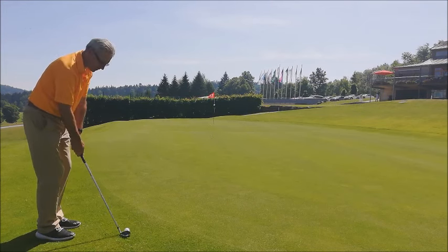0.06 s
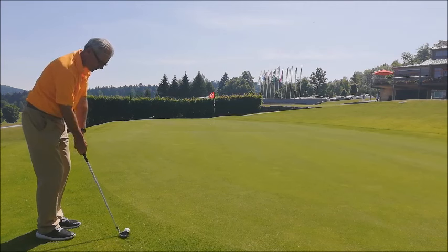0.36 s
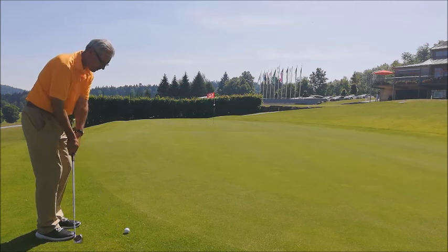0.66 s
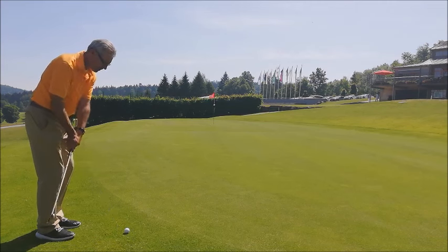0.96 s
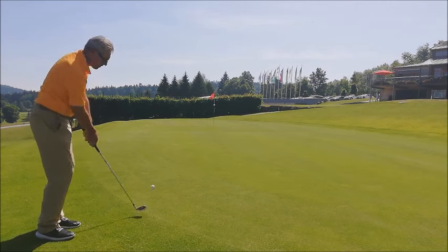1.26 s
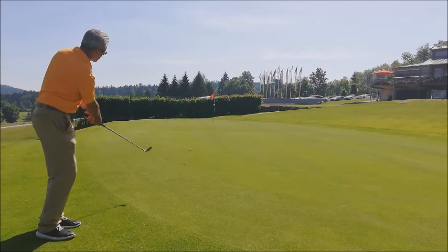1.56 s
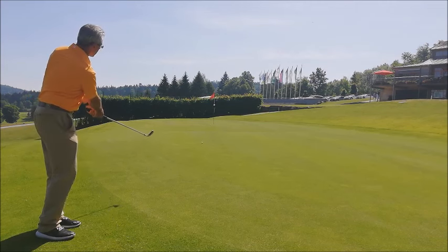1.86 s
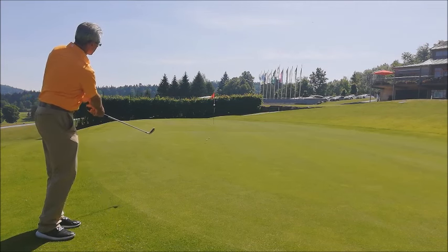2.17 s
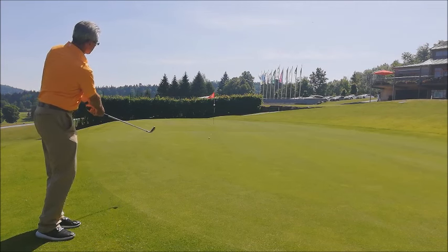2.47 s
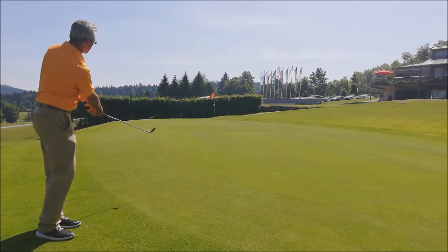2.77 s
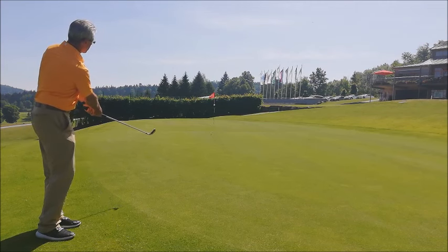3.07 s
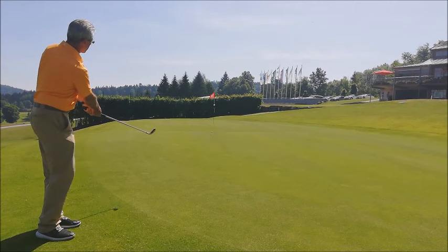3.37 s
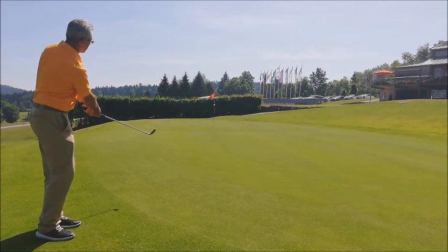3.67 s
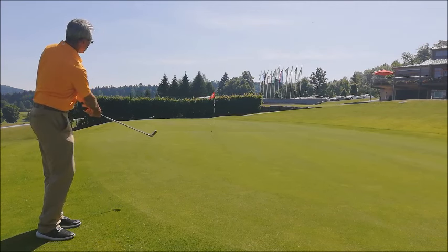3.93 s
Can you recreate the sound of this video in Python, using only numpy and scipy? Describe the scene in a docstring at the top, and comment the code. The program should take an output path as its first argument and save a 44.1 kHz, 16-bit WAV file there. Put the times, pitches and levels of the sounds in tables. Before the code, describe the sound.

A golf club chips a ball with one sharp click, a few metres to the left. Light wind rumbles on the microphone over a distant hush, and small birds chirp faintly, most clearly near the end.

```python
"""Beside a golf green, a golfer chips a ball a few metres to the left of the microphone.
One sharp click sets the ball and club head ringing, and the bottom of the club brushes the grass.
Light wind rumbles and bumps against the microphone, over a distant hush of traffic and trees
with a few faint tones in it. Small birds whistle quick chirps, the nearest towards the end."""
import sys
import numpy as np
from scipy import signal
from scipy.fft import rfft, irfft
from scipy.io import wavfile
from scipy.ndimage import uniform_filter1d

SR = 44100
rng = np.random.default_rng(int(sys.argv[2]) if len(sys.argv) > 2 else 0)


def transcribe(signal):
    """Save signal, clipped to [-1, 1], as a 16-bit WAV file at the path in sys.argv[1]."""
    frames = np.atleast_2d(signal).T
    limited = np.clip(frames, -1, 1)
    pcm = np.round(limited * 32767).astype(np.int16)
    wavfile.write(sys.argv[1], SR, pcm)


N = 176400  # 4 seconds

# The tone colour of the hush at each ear. Each row: frequency in Hz, relative level in dB.
HUSH_LEFT_COLOUR = [(100, 1), (500, -9), (780, -9), (1010, 0), (1200, -0.5), (1400, 4), (1850, 0),
                    (2600, -10.5), (3400, -10.5), (4200, -13.5), (7500, -20.5), (9000, -16.5),
                    (12000, -24.5), (15500, -28.5)]
HUSH_RIGHT_COLOUR = [(100, 0.5), (500, -6.5), (720, -1.5), (830, -4.5), (1030, 1.5), (1250, -3),
                     (1450, 1.5), (1850, -4), (2600, -7.5), (3400, -8), (7500, -15.5), (12000, -21.5),
                     (15500, -25.5)]
# The slow rise and fall of the hush. Each row: time in seconds, level change in dB.
HUSH_RISE_AND_FALL = [(0, 0.1), (0.9, -0.1), (1.7, 0.56), (2.2, 0.5), (2.7, -0.95), (3.2, 0), (3.8, 1.05),
                      (4, -0.7)]
# Faint distant tones. Each row: loudest moment in seconds, width in seconds, pitch in Hz, level in dB.
FAR_TONES = [(1.722, 0.17, 1010, -59.5), (1.918, 0.072, 734, -62), (3.56, 0.048, 725, -61),
             (3.83, 0.042, 700, -56.5)]
# Bird chirps. Each row: start and length in seconds, first, middle and last pitch in Hz, level in dB.
CHIRPS = [(0.206, 0.033, 3520, 3050, 2840, -57), (1.778, 0.017, 3400, 3530, 3700, -56),
          (2.09, .03, 3100, 2700, 2430, -58), (2.735, .014, 6000, 5150, 4500, -54),
          (3.037, 0.05, 4180, 4100, 3970, -56.5), (3.132, 0.011, 6200, 5680, 5150, -53),
          (3.145, 0.012, 5800, 5260, 4750, -48.5), (3.168, .015, 4220, 4030, 3900, -55),
          (3.247, 0.012, 4770, 5040, 5600, -53), (3.267, 0.024, 5650, 4860, 5950, -46),
          (3.301, 0.011, 6670, 6030, 6500, -46.5), (3.319, 0.038, 6350, 5600, 5340, -42)]

# The strength of the wind's rumble and swirls. Each row: time in seconds, relative level in dB.
RUMBLE_STRENGTH = [(0.0, -37), (0.37, -38), (0.55, -35), (0.75, -36), (0.99, -33), (1.07, -27),
                   (1.14, -35.5), (1.24, -29.5), (1.34, -42), (1.43, -25), (1.57, -47), (1.65, -34.5),
                   (1.92, -40), (1.97, -31), (2.45, -38.5), (2.8, -38.5), (2.96, -35.5), (3.02, -43.5),
                   (3.5, -42.5), (3.8, -36.5), (3.93, -28), (4.0, -31.5)]
SWIRL_STRENGTH = [(0, -41), (.45, -43.5), (.85, -50.5), (1.05, -42), (1.42, -37), (1.56, -44.5),
                  (1.7, -37.5), (1.9, -44), (2.06, -43.5), (2.42, -38), (2.55, -47), (2.92, -52),
                  (3.05, -52), (3.7, -50), (3.83, -51), (3.9, -43), (4, -38)]
# The tone colours of the deep rumble, the brighter swirls and the flutter around each bump of air.
# Each row: frequency in Hz, relative level in dB.
RUMBLE_COLOUR = [(12, -15), (25, 0.5), (45, -2.5), (80, -0.5), (125, -10.5), (200, -21), (400, -53),
                 (900, -102)]
SWIRL_COLOUR = [(40, 2.5), (90, 0), (140, 2), (200, -6), (300, -14.5), (450, -33), (800, -75.5),
                (2000, -75)]
FLUTTER_COLOUR = [(50, 1), (160, -1), (300, -16), (450, -21), (700, -42), (1500, -67)]
# Bumps of air. Each row: time in seconds, flutter width in seconds, level in dB, pitch in Hz.
AIR_BUMPS = [(.285, 0.0085, -27, 151), (.395, 0.0043, -21, 97), (0.471, 0.03, -28.5, 121),
             (0.692, 0.0088, -23.5, 128), (0.987, 0.0055, -25, 142), (1.06, 0.0074, -14.5, 54.4),
             (1.225, 0.0088, -17, 119), (1.299, 0.009, -26.5, 139), (1.346, 0.006, -29.5, 149),
             (1.419, 0.019, -17.5, 109), (1.48, 0.0053, -22.5, 108), (1.71, 0.011, -20, 134),
             (1.757, 0.0038, -25.5, 152), (1.80, 0.0033, -22.5, 119), (1.862, 0.0074, -26, 169),
             (1.885, 0.008, -23.5, 150), (1.956, 0.0072, -22, 115), (2.153, 0.014, -23, 149),
             (2.282, 0.0049, -26.5, 135), (2.314, 0.0083, -34, 150), (2.371, 0.0041, -26, 139),
             (2.419, .006, -32, 150), (2.45, 0.005, -28, 149), (2.915, 0.0097, -29.5, 118),
             (3.882, 0.0082, -23.5, 130)]

# The tone colours of the grass swish, the crack of the hit and its scatter off the ground.
# Each row: frequency in Hz, relative level in dB.
GRASS_COLOUR = [(500, 5), (2000, -6), (4500, 0), (7000, -7), (11500, -1), (15000, -16)]
CRACK_COLOUR = [(1500, -35), (3600, -2), (5000, 4), (6500, -4), (8000, -7), (10000, -3), (15000, -16)]
SCATTER_COLOUR = [(500, -5), (1050, 11.5), (3000, -3), (6000, -25), (14000, -22)]
# The ringing tones of ball and club head. Each row: pitch in Hz, relative level in dB,
# seconds to fade by 60 dB, left level minus right level in dB.
RING_TONES = [(723, -24, 0.013, 6), (1071, -19.5, 0.0273, 1), (1210, -2, 0.007, 10.5),
              (1770, -11.1, 0.012, 2.5), (2900, -12, 0.0212, 14), (3250, -14.5, 0.0082, 7),
              (4330, -20, 0.011, 7), (4850, -10.5, 0.0047, -4), (6728, -21.5, 0.0034, -1),
              (9000, -29.9, 0.013, 15), (9498, -39, 0.0163, 11), (10520, -27, 0.006, 21),
              (11900, -29, 0.017, 20), (13700, -36, 0.0059, 22)]


def gain(db):
    """Turn decibels into a number to multiply by."""
    return 10 ** (np.asarray(db) / 20)


def normalise(x):
    """Scale a signal so that its average size (rms) is 1."""
    return x / np.sqrt(np.mean(x ** 2))


def pan(db):
    """Gains that make the left ear db louder than the right; below zero favours the right."""
    return gain(np.array([[db], [-db]]) / 2)


def noise(colour):
    """Noise of average size 1, shaped by a tone colour table."""
    hz, db = np.array(colour, float).T
    frequencies = np.maximum(np.arange(N // 2 + 1) * SR / N, 1)
    shape = gain(np.interp(np.log(frequencies), np.log(hz), db))
    return normalise(irfft(rfft(rng.standard_normal(N)) * shape, N))


def stereo_noise(colour):
    """A separate noise for each ear."""
    return np.array([noise(colour), noise(colour)])


def wander(rate):
    """A smooth random curve of average size 1 that changes about rate times a second."""
    window = max(int(SR / rate), 2)
    smoothed = uniform_filter1d(rng.standard_normal(N), window, mode="wrap")
    return normalise(uniform_filter1d(smoothed, window, mode="wrap"))


def follow(t, table):
    """Join a table's (time, value) points with straight lines."""
    return np.interp(t, *np.array(table).T)


def distant_hush(t):
    """Far traffic and trees blur into a gently swelling noise, different at each ear."""
    swell_db = follow(t, HUSH_RISE_AND_FALL)
    left_db, right_db, flicker_db = -47.5, -51, 0.8
    left = noise(HUSH_LEFT_COLOUR) * gain(left_db + swell_db + flicker_db * wander(15.4))
    right = noise(HUSH_RIGHT_COLOUR) * gain(right_db + swell_db + flicker_db * wander(15.4))
    return np.array([left, right])


def far_tones(t):
    """Faint wavering tones rise out of the hush and sink back."""
    tones = 0
    for at, width, hz, db in FAR_TONES:
        pitch_hz = hz + 38 * wander(90.6)
        swell = np.exp(-0.5 * ((t - at) / width) ** 2)
        tones += gain(db) * swell * np.sin(2 * np.pi * np.cumsum(pitch_hz) / SR)
    return pan(db=-8) * tones


def birds(t):
    """Small birds whistle quick glides through three pitches, and the trees echo them."""
    song = 0
    for start, length, first, middle, last, db in CHIRPS:
        progress = np.clip((t - start) / length, 0, 1)
        bend_hz = (2 * middle - first - last) * 2 * progress * (1 - progress)
        glide_hz = first + (last - first) * progress + bend_hz
        pitch_hz = glide_hz * (1 + 0.018 * wander(400))
        swell = np.sqrt(np.abs(np.sin(np.pi * progress ** 1.6)))  # loudest late in the chirp
        song += gain(db) * swell * np.sin(2 * np.pi * np.cumsum(pitch_hz) / SR)
    song *= normalise(gain(wander(200)))  # the level wavers by about 1 dB
    echo_rise_s, echo_fade_s = 0.0037, 0.024
    trees = rng.standard_normal((2, N)) * np.exp(-t / echo_fade_s) * (1 - np.exp(-t / echo_rise_s))
    echo = signal.fftconvolve(song[None], normalise(trees) / np.sqrt(N), axes=1)[:, :N]
    return pan(db=-7) * song + gain(db=-4.5) * echo


def moving_air(colour, spread_db, flicker_db, rate):
    """Unsteady wind noise: one part both ears share, plus a weaker part that is opposite at each."""
    shared = noise(colour)
    opposite = np.array([[1], [-1]]) * noise(colour)
    flicker = normalise(gain(flicker_db * wander(rate)))
    return (shared + gain(spread_db) * opposite) * flicker


def wind(t):
    """Gusts rumble and swirl on the microphone; each bump is one push of air in a ragged flutter."""
    rumble = moving_air(RUMBLE_COLOUR, spread_db=-19, flicker_db=2.5, rate=14)
    swirls = moving_air(SWIRL_COLOUR, spread_db=-9.5, flicker_db=4, rate=32)
    air = gain(follow(t, RUMBLE_STRENGTH) + 2) * rumble
    air += gain(follow(t, SWIRL_STRENGTH) + 1.5) * pan(db=2.5) * swirls
    flutter = noise(FLUTTER_COLOUR)
    for at, width, db, hz in AIR_BUMPS:
        phase = np.pi * hz * (t - at)
        push = (1 - 2 * phase ** 2) * np.exp(-phase ** 2)
        roughness = gain(db=-8.5) * hz / 138  # slow pushes are smoother
        swell = np.exp(-0.5 * ((t - at) / width) ** 2)
        air += gain(db) * (push + roughness * flutter * swell)
    left, right = air
    right_delay_s = 0.00082
    return np.array([left, np.interp(t - right_delay_s, t, right)])


def grass_swish(t):
    """The bottom of the club brushes the grass just after the ball leaves."""
    loudest_s, width_s = 1.285, 0.011
    swell = np.exp(-0.5 * ((t - loudest_s) / width_s) ** 2)
    return pan(db=13.5) * gain(db=-52) * stereo_noise(GRASS_COLOUR) * swell


def club_hits_ball(t):
    """A brief hit rings the ball and club head, with a crack and a faint scatter off the ground."""
    hit_s, contact_s, crack_fade_s, scatter_fade_s = 1.25955, 0.00027, 0.0023, 0.0079
    age = np.maximum(t - hit_s, 0)
    ring = 0
    for index, (hz, db, fade_s, side_db) in enumerate(RING_TONES):
        tone = (-1) ** index * np.sin(2 * np.pi * hz * age)  # every second tone starts downwards
        ring += pan(side_db) * gain(db - 60 * age / fade_s) * tone
    crack = pan(db=12.5) * gain(db=-28.5) * stereo_noise(CRACK_COLOUR) * np.exp(-age / crack_fade_s)
    scatter = pan(db=16.5) * gain(db=-26.5) * stereo_noise(SCATTER_COLOUR) * np.exp(-age / scatter_fade_s)
    onset = 1 - np.exp(-age / contact_s)
    click = onset * (ring + crack + scatter)
    lowest_hz = 450  # the click carries little below this
    bass_cut = signal.butter(3, lowest_hz, "highpass", fs=SR, output="sos")
    return signal.sosfilt(bass_cut, click + 1e-18)


def scene():
    """Add up the distant sounds, the birds, the wind and the golf shot."""
    t = np.arange(N) / SR
    return distant_hush(t) + far_tones(t) + birds(t) + wind(t) + grass_swish(t) + club_hits_ball(t)


def record(dry):
    """The recorder flattens peaks beyond full scale and cuts the highest treble."""
    highest_hz = 15400
    treble_cut = signal.ellip(14, 0.1, 80, highest_hz, fs=SR, output="sos")
    return signal.sosfilt(treble_cut, np.clip(dry, -1, 1))


dry = scene()
out = record(dry)
transcribe(out)
```